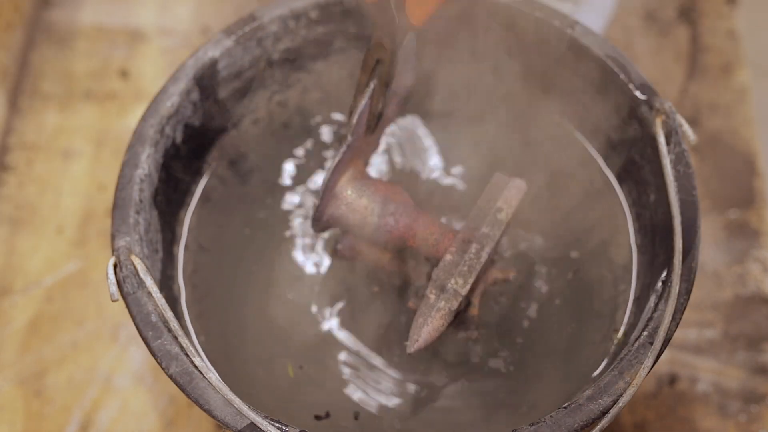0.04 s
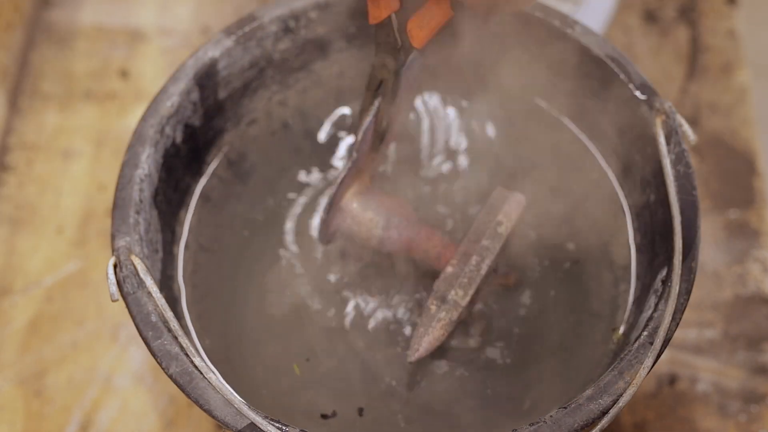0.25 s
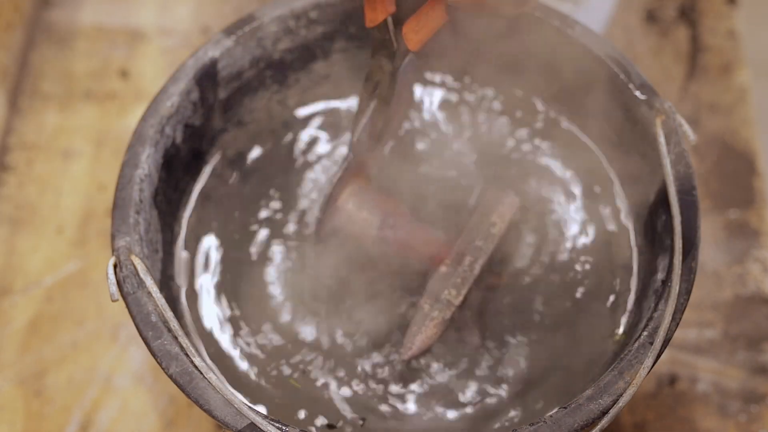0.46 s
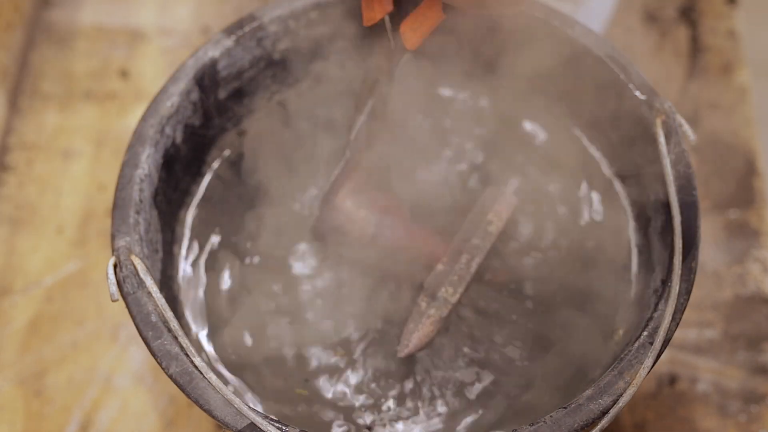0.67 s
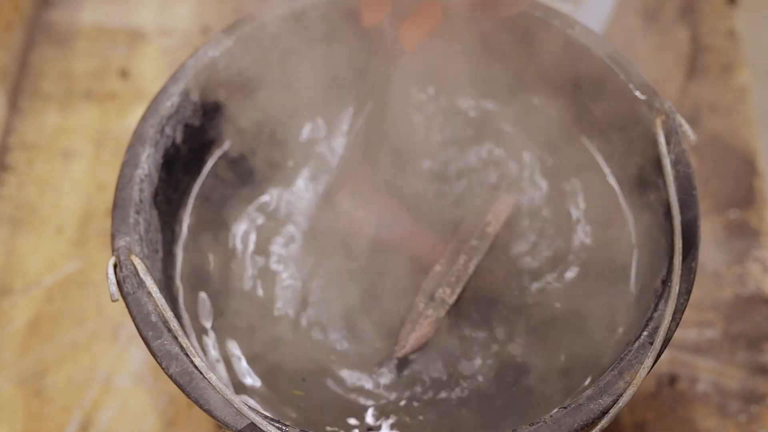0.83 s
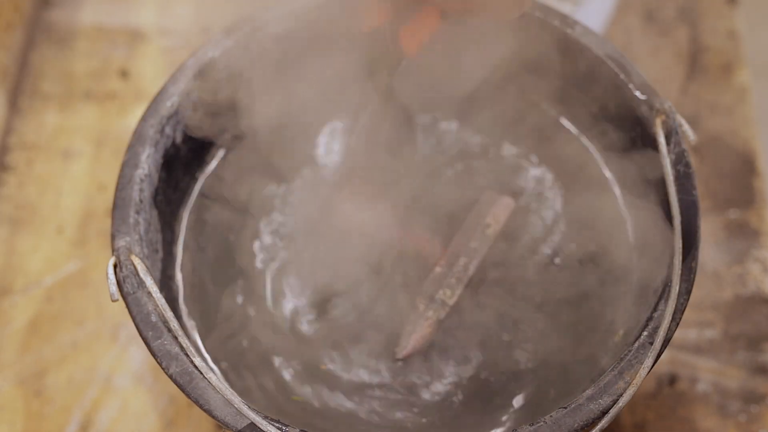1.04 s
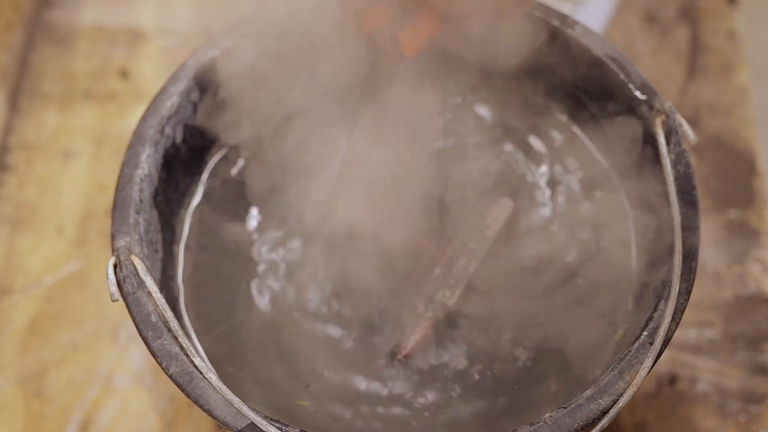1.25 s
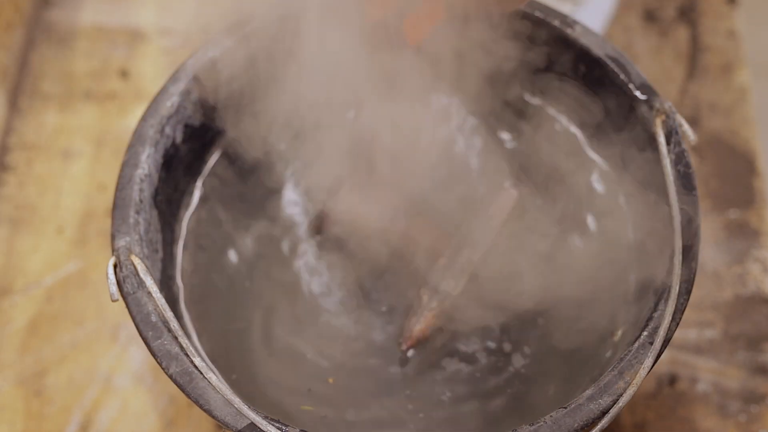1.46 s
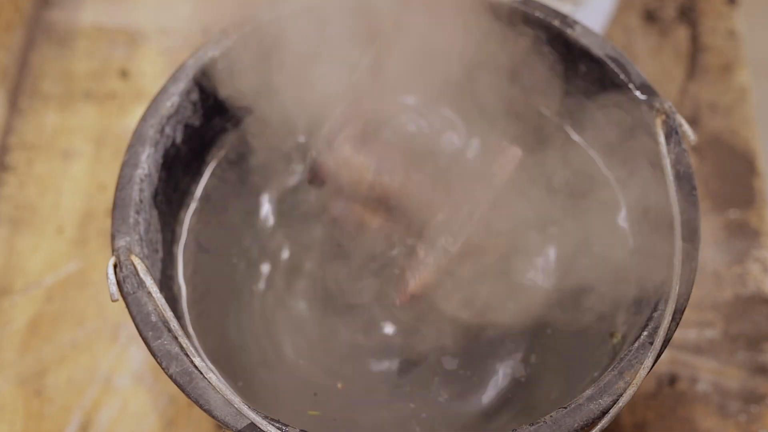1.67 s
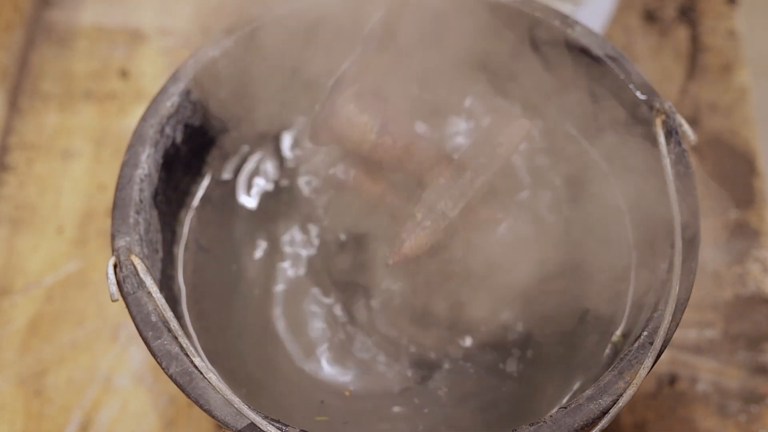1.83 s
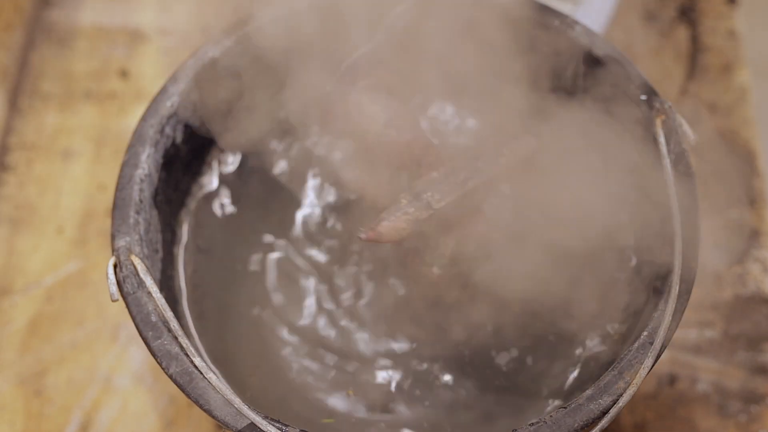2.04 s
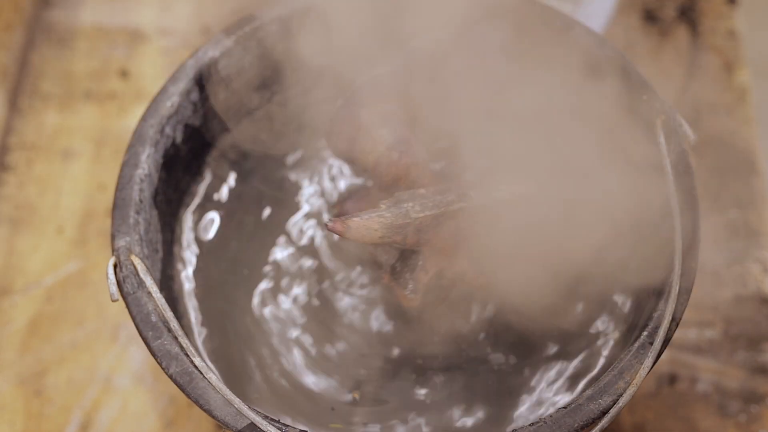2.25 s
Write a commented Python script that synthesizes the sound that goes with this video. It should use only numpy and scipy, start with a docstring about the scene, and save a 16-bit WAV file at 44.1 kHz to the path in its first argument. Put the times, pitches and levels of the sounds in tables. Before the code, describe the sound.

Hot steel sizzles faintly, then plunges into a bucket of water with a loud, sputtering steam hiss that surges twice and fades. Water bubbles and churns underneath, heard close by in a workshop with a faint motor hum.

```python
"""A workshop, beside a bucket of water, in stereo. Red-hot steel is lowered in: it sizzles faintly,
then plunges, and countless steam bubbles collapse in a hiss that surges twice and fades. The steam
sings briefly in narrow bands while larger bubbles churn and glug in the water. All of this reaches
the microphones coloured by the bucket's hollow; behind it a motor hums in the room."""
import sys
import numpy as np
from scipy import signal
from scipy.fft import rfft, irfft
from scipy.io import wavfile
from scipy.ndimage import uniform_filter1d

SR = 44100
rng = np.random.default_rng(int(sys.argv[2]) if len(sys.argv) > 2 else 0)


def unload_audio(sound):
    """Save the sound as a 16-bit wav file, at the path given as the first command line argument."""
    columns = np.transpose(np.atleast_2d(sound))
    # keep every value between -1 and 1, then stretch to whole-number steps
    steps = np.round(np.clip(columns, -1, 1) * 32767)
    wavfile.write(sys.argv[1], SR, steps.astype(np.int16))


N = 105840

# Strength of the boiling on the steel: time_s, level_db
BOILING = [(0, -59.5), (.17, -60.5), (.232, -56.5), (.241, -43), (.275, -39), (.318, -35.5), (.34, -36.7),
           (.362, -36), (.45, -37), (.55, -39), (.61, -38.5), (.66, -39.5), (.93, -41.5), (1.04, -38.5),
           (1.13, -36.8), (1.26, -41.5), (1.35, -42.5), (1.44, -41.5), (1.56, -45.5), (1.86, -48.5),
           (2.08, -50), (2.4, -55)]


def undb(db):
    """Decibels to gain."""
    return 10 ** (np.asarray(db) / 20)


def unit(x):
    """Scaled to rms 1."""
    return x / np.sqrt(np.mean(x ** 2))


def curve(rows):
    """Gain over time from rows of time_s, level_db."""
    return undb(np.interp(np.arange(N) / SR, *np.array(rows).T))


def bins():
    """Frequencies of the spectrum in Hz."""
    return np.maximum(np.arange(N // 2 + 1) * SR / N, 1)


def over_pitch(rows):
    """Rows of pitch_hz, value joined on a log axis."""
    hz, value = np.array(rows).T
    return np.interp(np.log(bins()), np.log(hz), value)


def bell(x, centre, width):
    """A smooth hump, 1 at the centre and half as high at the edges of its width."""
    return 2 ** -((2 * (x - centre) / width) ** 2)


def colour(x, gain):
    """Filtered by a gain per frequency, at rms 1."""
    return unit(irfft(rfft(x) * gain, N))


def noise():
    """Two unrelated white noises."""
    return rng.standard_normal((2, N))


def wander(turns_per_s):
    """Smooth random wandering at rms 1."""
    hold = max(int(SR / turns_per_s), 1)
    steps = np.repeat(rng.standard_normal(N // hold + 1), hold)
    return unit(uniform_filter1d(steps, hold)[:N])


def stereo_image(pair, lag_s=2.4e-5, full_lag_hz=2900):
    """Two unrelated signals become left and right: alike in the bass, the treble late on the left."""
    # Likeness of the two channels: pitch_hz, correlation
    likeness = [(50, 1), (300, 0.9), (700, 0.76), (1200, 0.81), (1550, 0.24), (1850, 0.49), (2250, 0.22),
                (2700, 0.33), (3300, 0.4), (4200, 0.14), (5600, 0.4), (9000, 0.32), (15000, 0.12)]
    hz, alike = bins(), np.clip(over_pitch(likeness), 0, .999)
    mid, side = rfft(pair) * np.sqrt(np.array([1 + alike, 1 - alike]) / 2)
    late = np.exp(-2j * np.pi * hz * lag_s * np.minimum(hz / full_lag_hz, 1))
    return irfft(np.array([(mid + side) * late, mid - side]), N)


def motor_and_room():
    """A wavering motor hum over low room rumble, a little to the left."""
    # Tones of the motor: pitch_hz, level_db
    motor_tones = [(48.6, -75), (99, -72.5), (366, -78)]
    # Spectrum of the room tone: pitch_hz, density_db
    room_spectrum = [(20, -21), (35, -11), (48, 1), (65, -2), (85, -6.5), (150, -15.5), (300, -21.5),
                     (600, -16.5), (2000, -19), (12000, -55)]
    # Slow drift of the rumble: time_s, gain_db
    rumble_drift = [(0, 3), (.2, 3.5), (.4, 1), (.75, 1.5), (1.05, -1), (2.4, 1.5)]
    t = np.arange(N) / SR
    hum = sum(undb(db) * unit(np.sin(2 * np.pi * hz * t + .5 * wander(9))) for hz, db in motor_tones)
    room_tone = stereo_image(colour(noise(), undb(over_pitch(room_spectrum))))
    rumble = undb(-65.5) * curve(rumble_drift) * room_tone
    return (hum + rumble) * undb([[1.25], [-1.25]])


def bubbles(per_s, low_hz, high_hz, cycles, glide, spread_db):
    """Bubbles of random size ring for some cycles, rising in pitch as they near the surface."""
    out = np.zeros((2, 2 * N))
    for when, smallness, strength, place in rng.random((int(per_s * N / SR), 4)):
        hz = low_hz * (high_hz / low_hz) ** smallness
        age_cycles = np.arange(min(int(np.pi * cycles * SR / hz), N)) * hz / SR
        life = age_cycles / cycles
        ring = np.sin(2 * np.pi * age_cycles * (1 + glide * life / 2)) * np.exp(-2 * life)
        ring *= undb(-spread_db * np.log(1 - .98 * strength)) * np.sqrt(hz)
        start, angle = int(when * N), 2 * np.pi * place
        out[:, start:start + len(ring)] += np.outer([np.cos(angle), np.sin(angle)], ring)
    return unit(out[:, :N])


def glugs(start_s=.27, rise_s=.056, fade_db_per_s=12):
    """Big pockets of steam well up after the plunge and grow weaker."""
    age_s = np.arange(N) / SR - start_s
    strength = np.clip(age_s / rise_s, 0, 1) * undb(-63 - fade_db_per_s * age_s)
    return strength * bubbles(per_s=150, low_hz=167, high_hz=511, cycles=9.6, glide=.1, spread_db=0)


def churning():
    """Ringing bubbles over a wash of thrown water."""
    # Strength of the churning: time_s, level_db
    strength = [(0, -70), (.23, -68), (.3, -51), (.35, -55.5), (.39, -48.5), (.44, -53.5), (.5, -50.5),
                (.65, -54.5), (.9, -54.5), (1.13, -49.5), (1.33, -53.5), (1.45, -52), (1.6, -56),
                (1.95, -62), (2.4, -65.5)]
    # Spectrum of the stirred water: pitch_hz, density_db
    water_spectrum = [(120, -41), (250, -13), (600, -7.5), (850, -3.5), (1150, 1), (1500, -3), (2200, -5.5),
                      (4000, -37), (9000, -45)]
    tone = undb(over_pitch(water_spectrum))
    rings = bubbles(per_s=650, low_hz=351, high_hz=2600, cycles=10.9, glide=.045, spread_db=3)
    pops = undb(-4.5) * colour(rings, tone * np.sqrt(bins()))
    wash = undb(-1.5) * colour(noise(), tone)
    return curve(strength) * (wash + pops)


def singing():
    """Bubbles of like size collapse along the steel: a narrow band swells out of the hiss and dies."""
    # Singing bands, gain relative to the boiling: peak_s, rise_s, fall_s, pitch_hz, width_hz, gain_db
    bands = [(.1, .09, 0.16, 6070, 650, -7.5), (0.31, 0.18, 0.2, 2310, 550, -9),
             (0.35, .04, 0.064, 3900, 1500, -6.5), (0.28, .06, 0.065, 6050, 980, -5),
             (1.275, .2, 0.28, 4650, 340, -8), (1.65, .04, .1, 2300, 600, -7.5),
             (1.95, 0.017, .1, 2270, 290, -8), (1.7, 0.031, .025, 3400, 280, -7),
             (2.31, .25, .3, 3760, 1300, -4.5)]
    t, out = np.arange(N) / SR, 0
    for peak_s, rise_s, fall_s, pitch_hz, width_hz, gain_db in bands:
        swell = bell(t, peak_s, 2 * np.where(t < peak_s, rise_s, fall_s))
        band = colour(noise(), bell(bins(), pitch_hz, width_hz))
        out = out + undb(gain_db) * swell * band
    return out * curve(BOILING)


def steam(crackles_per_s=5400, crackle_spread_db=2.5, sputter_db=.35):
    """Tiny collapses merge into a sputtering hiss; the bigger ones stand out as crackle."""
    # Spectrum of the collapsing steam: pitch_hz, density_db
    hiss_spectrum = [(300, -22), (1000, -19), (1600, -10.5), (2300, -1.5), (3200, -1.5), (4500, -.5),
                     (6500, -2), (9000, -4), (12000, -9), (15500, -15.5)]
    tone = undb(over_pitch(hiss_spectrum))
    collapses = rng.random((2, N)) < crackles_per_s / 2 / SR
    size = np.minimum(rng.exponential(size=(2, N)), 5)
    clicks = collapses * np.sign(noise()) * undb(crackle_spread_db * size)
    hiss = undb(.19) * colour(noise(), tone)
    crackle = undb(-3.5) * colour(clicks, tone)
    sputter = undb(sputter_db * wander(170))
    return (hiss + crackle) * curve(BOILING) * sputter


def treble_drift(x, corner_hz=9100):
    """The top of the hiss opens and closes a little."""
    # Lift of the treble: time_s, gain_db
    lift = [(0, 0.83), (.22, 1.5), (.3, -.5), (.47, -0.029), (.6, -0.44), (1.12, 1.7), (1.35, -0.12),
            (1.9, 0), (2.4, -1.5)]
    top = irfft(rfft(x) / (1 + (corner_hz / bins()) ** 6), N)
    return x + top * (curve(lift) - 1)


def bucket(x):
    """The air above the water rings at its own pitches."""
    # Peaks and dips of the hollow at each microphone: pitch_hz, width_hz, left_db, right_db
    resonances = [(310, 30, -6, -9), (353, 33, 1.5, 4), (442, 210, 4, -0.5), (525, 59, -10, -4.5),
                  (577, 28, 2.5, 7.5), (745, 60, -11, -4), (794, 28, 7.5, 2.5), (896, 85, 7, 1),
                  (960, 29, -5, -8.5), (1038, 57, 0.5, 4), (1208, 41, 5, 1.5), (1306, 37, 4.5, -0.5),
                  (1410, 35, -9.5, 0), (1450, 65, 2, 5), (1685, 61, -0.5, 4.5), (1852, 37, 9, 9.5),
                  (1990, 45, -3, 6), (2140, 49, -8.5, -0.5), (2353, 74, -0.5, 2), (2640, 50, 6.5, 2.5),
                  (2900, 170, 2.5, 1), (3280, 240, -1.5, -0.5), (3900, 70, 5.5, -6), (4030, 37, 6, -1),
                  (4300, 70, 2, 4), (4560, 30, -7, 8.5), (4480, 80, 6.5, -1.5), (6830, 110, 4, 4),
                  (7440, 210, 4, 2)]
    db = sum(np.outer([left, right], bell(bins(), hz, width)) for hz, width, left, right in resonances)
    return irfft(rfft(x) * undb(db), N)


def scene():
    """Steam and water sound through the bucket, over the workshop's hum."""
    quench = treble_drift(steam()) + singing() + churning() + glugs()
    return bucket(stereo_image(quench)) + motor_and_room()


def record(dry, top_hz=15750):
    """The recorder cuts the top steeply."""
    return signal.sosfilt(signal.ellip(12, .1, 80, top_hz, fs=SR, output="sos"), dry)


dry = scene()
out = record(dry)
unload_audio(out)
```